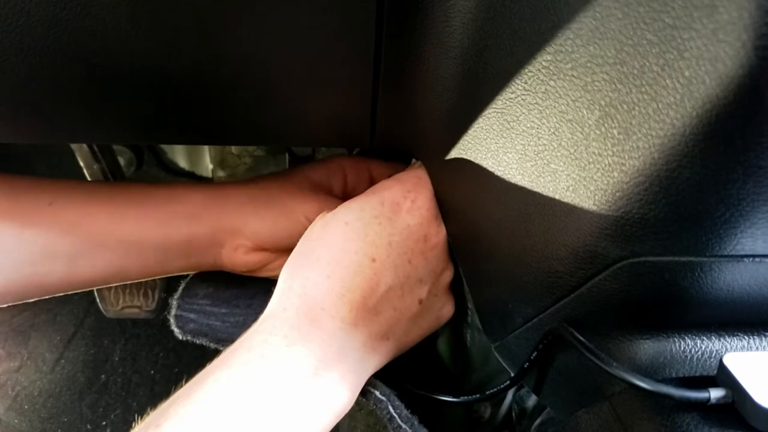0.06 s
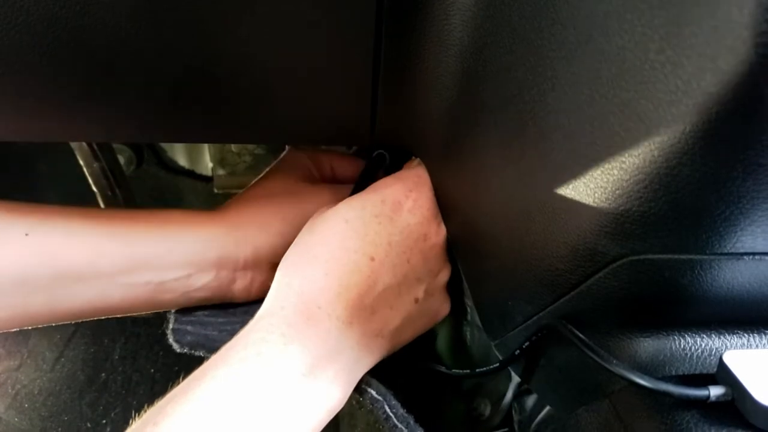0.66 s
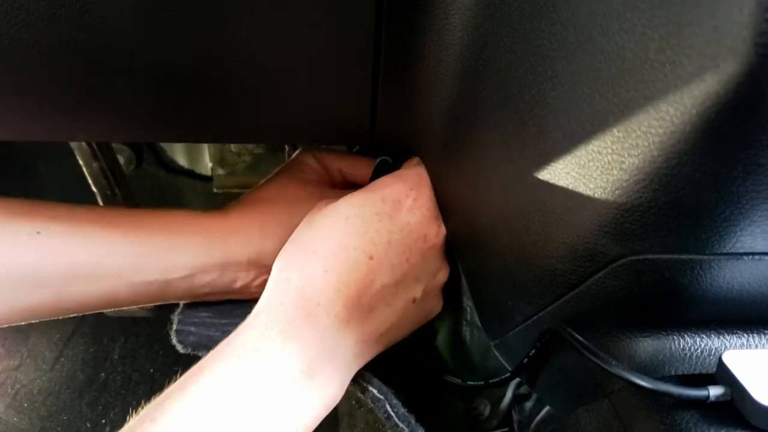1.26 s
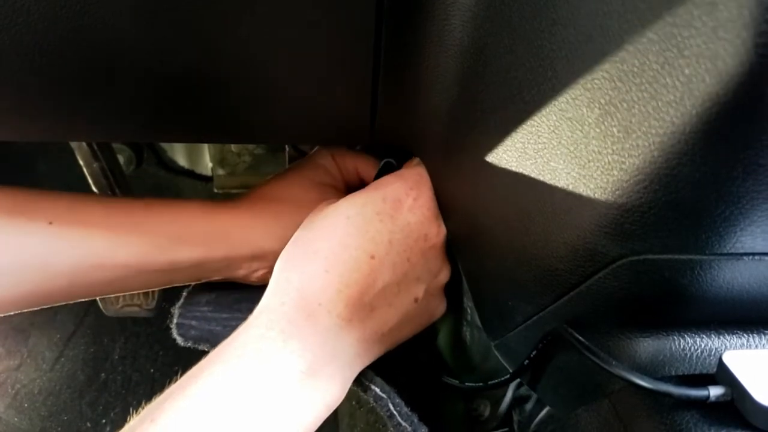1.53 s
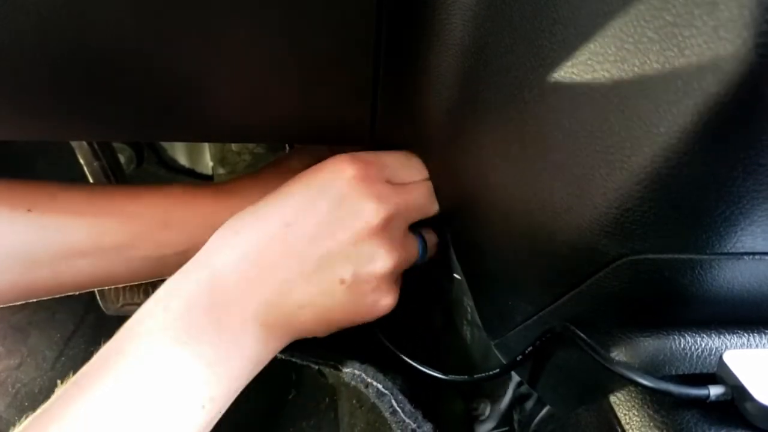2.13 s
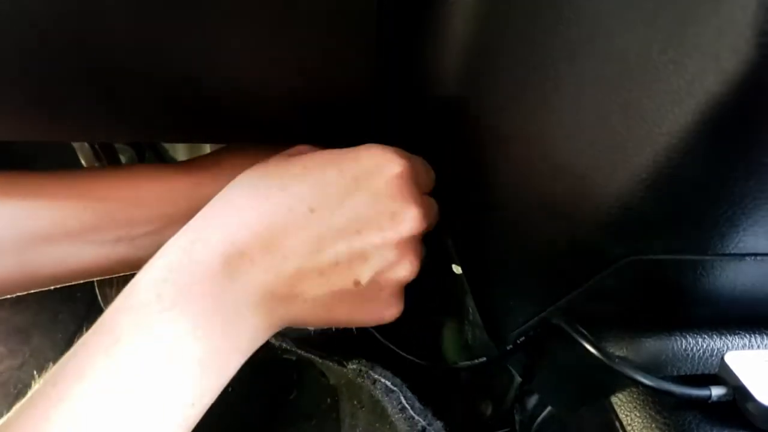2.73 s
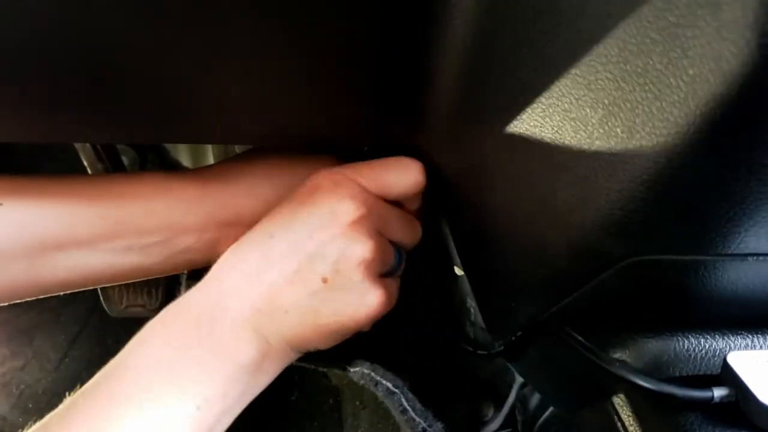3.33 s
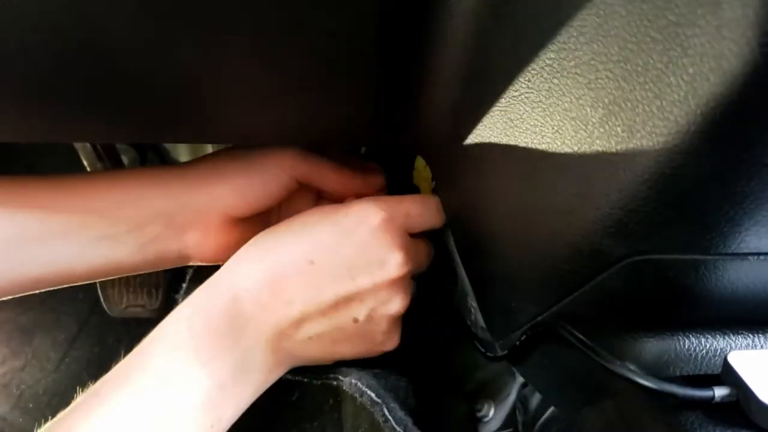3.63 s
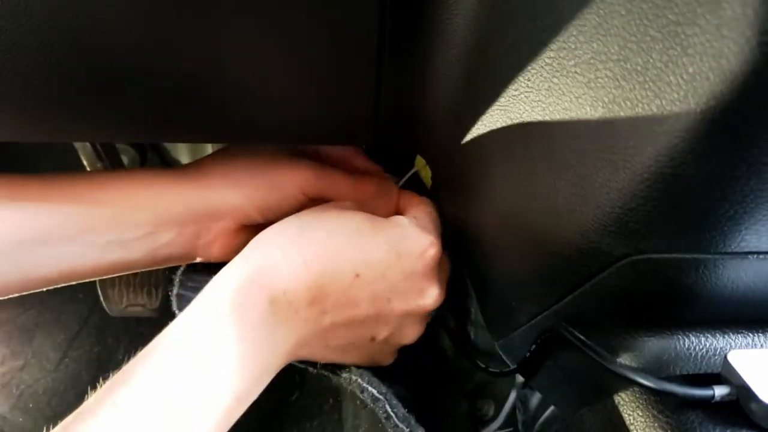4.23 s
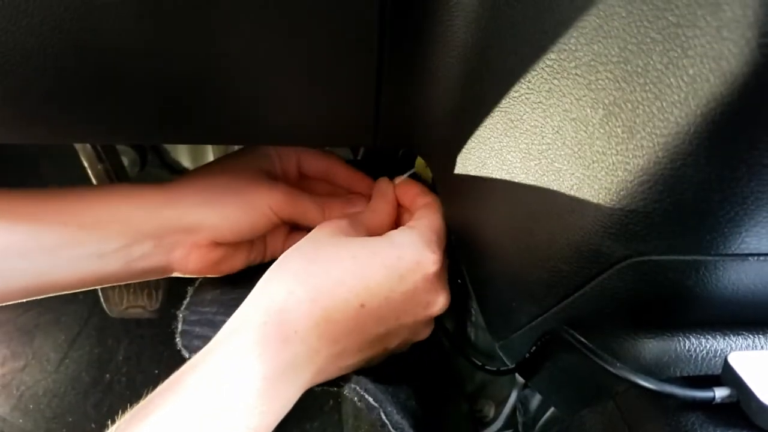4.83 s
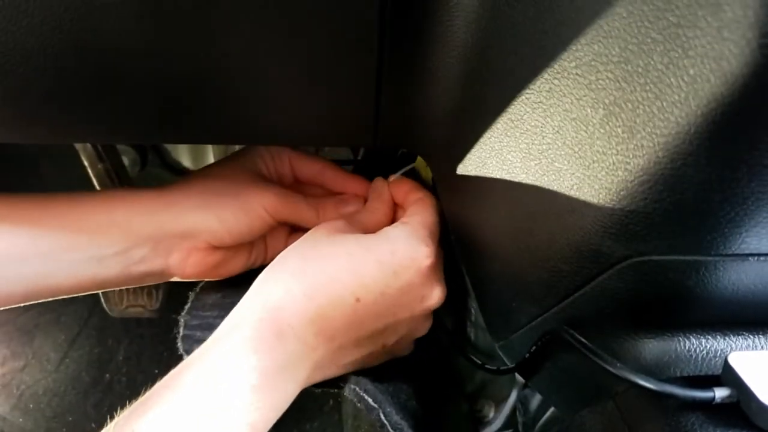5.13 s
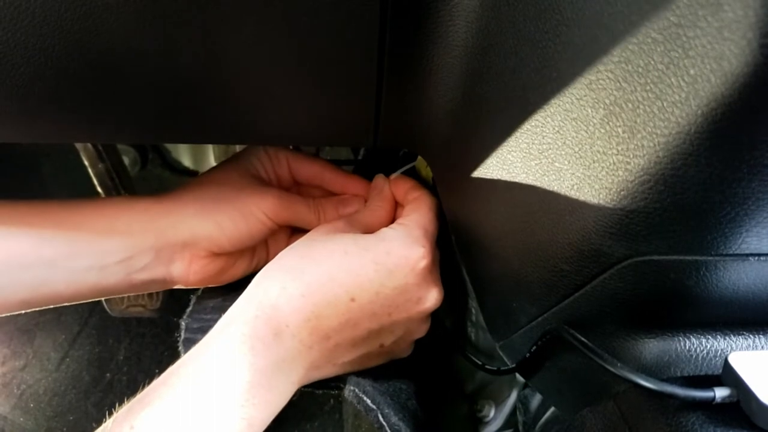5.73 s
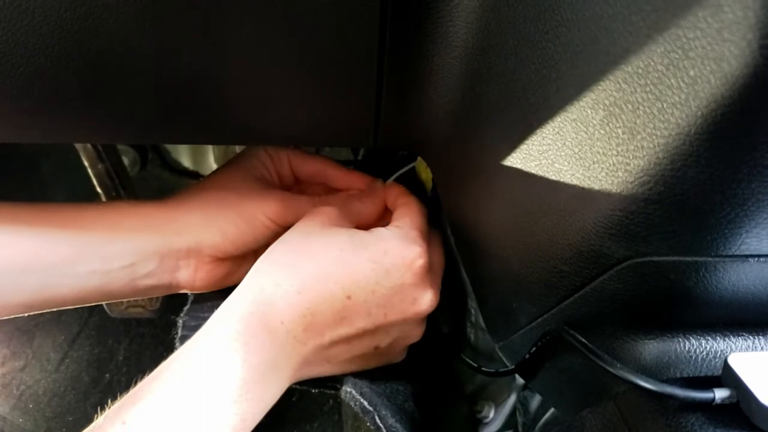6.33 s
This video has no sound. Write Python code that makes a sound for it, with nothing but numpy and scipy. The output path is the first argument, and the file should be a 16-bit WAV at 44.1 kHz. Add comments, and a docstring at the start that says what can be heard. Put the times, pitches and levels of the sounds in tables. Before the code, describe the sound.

Hands rustle and knock against plastic trim, working a zip tie around a cable, with sharp snaps, clacks and a faint low hum.

```python
"""Hands brush and rub over a low hum, working a plastic zip tie round a cable behind the trim of a
vehicle footwell. Fingers knock on a hollow shroud, cable and plug clack on the trim, arms bump the
panel; each rings the modes of the part struck. The tie's end is flicked and hard plastic snaps close
by. Last, the strap slides with a thin hiss and a few whistles. The cabin is small and dead."""
import sys
import numpy as np
from scipy import signal
from scipy.fft import rfft, irfft
from scipy.io import wavfile
from scipy.ndimage import map_coordinates

SR = 44100
rng = np.random.default_rng(int(sys.argv[2]) if len(sys.argv) > 2 else 0)


def pcm_store(signal):
    """Save signal as 16-bit PCM."""
    levels = np.round(np.clip(np.atleast_2d(signal), -1, 1) * 32767)
    wavfile.write(sys.argv[1], SR, levels.astype(np.int16).T)


N = 289737
TIME = np.arange(N) / SR
BIN_HZ = np.maximum(np.fft.rfftfreq(N, 1 / SR), 1)

# Skin on plastic. Each row: frequency in Hz, density in dB.
SWISH_SPECTRUM = [(2500, 4), (4000, -6.5), (5100, 0), (5800, -1), (6700, 2.5), (8300, -7), (11000, -3.5),
                  (13500, -4), (15500, -1)]
# Hollow panel. Each row: frequency in Hz, level in dB, t60 in seconds.
PANEL_MODES = [(184, 0, .08), (234, -2, .08), (264, -5, .06), (296, -1, .15), (365, -14, .06),
               (441, -10, .11)]
# Plastic shroud. Each row: frequency in Hz, level in dB, t60 in seconds.
SHROUD_MODES = [(510, -9, .05), (640, -4, .06), (850, -11, .035), (1120, 0, .055), (1278, 0, .055),
                (1480, -5, .03)]


def from_db(db):
    """Decibels to gain."""
    return 10 ** (np.asarray(db) / 20)


def unit_rms(x):
    """Scale to rms 1."""
    return x / np.sqrt(np.mean(x ** 2) + 1e-20)


def in_time(rows):
    """Per-sample curves from rows that start with a time in seconds."""
    s, *columns = np.transpose(rows)
    return [np.interp(TIME, s, c) for c in columns]


def at_hz(points, hz, column=1):
    """Interpolate a column over log frequency."""
    points = np.array(points)
    return np.interp(np.log(hz), np.log(points[:, 0]), points[:, column])


def add(out, start_s, sound):
    """Mix a sound in at start_s."""
    start = round(start_s * SR)
    out[:, start:start + sound.shape[1]] += sound[:, :N - start]


def wander(rate_hz):
    """Smooth random curve, rms 1."""
    knots = rng.standard_normal(N // 10)
    return unit_rms(np.interp(TIME * rate_hz, np.arange(len(knots)), knots))


def decay(t, t60):
    """Falls 60 dB in t60 seconds."""
    return np.exp(-np.log(1000) * t / max(t60, 1e-4))


def noise(spectrum, size=N, tilt_db_oct=0):
    """Coloured stereo noise, alike on both sides in the bass; rms 1."""
    # Each row: frequency in Hz, left-right correlation.
    coherence = [(100, 0.97), (300, 0.59), (600, 0.77), (1100, 0), (2000, 0.027), (15000, 0)]
    hz = np.maximum(np.fft.rfftfreq(size, 1 / SR), 1)
    mid, side = rfft(rng.standard_normal((2, size)))
    alike = at_hz(coherence, hz)
    pair = np.sqrt(1 + alike) * mid + np.sqrt(1 - alike) * side * [[1], [-1]]
    skirts = np.minimum(hz / spectrum[0][0], 1) * np.minimum(spectrum[-1][0] / hz, 1) ** 2
    colour = from_db(at_hz(spectrum, hz) + tilt_db_oct * np.log2(hz))
    return unit_rms(irfft(pair * skirts * colour, size))


def narrow_noise(hz, width_hz, size=N):
    """Noise in one resonance; centre and width may move; rms 1."""
    steps = np.cumsum(width_hz * np.ones(size)) / SR
    knots = rng.standard_normal((2, size // 4))
    in_phase, quadrature = (map_coordinates(row, [steps], order=1, mode="wrap") for row in knots)
    phase = 2 * np.pi * np.cumsum(hz * np.ones(size)) / SR
    return unit_rms(in_phase * np.cos(phase) + quadrature * np.sin(phase))


def narrow_pair(hz, width_hz, size=N):
    """One resonance, independent noise on each side."""
    return np.array([narrow_noise(hz, width_hz, size), narrow_noise(hz, width_hz, size)])


def struck(modes, t, spread_db):
    """Decaying modes with random strength and phase on each side."""
    return sum(from_db(db + spread_db * rng.standard_normal((2, 1))) * decay(t, t60)
               * np.sin(2 * np.pi * (hz * t + rng.random((2, 1)))) for hz, db, t60 in modes)


def rubbed(modes, tilt_db_oct):
    """Noise-driven modes, widths set by their decay; stereo, rms 1."""
    shape = sum(from_db(db + tilt_db_oct * np.log2(hz)) * np.sqrt(t60)
                / (1 + (2 * np.pi * (BIN_HZ - hz) * t60 / np.log(1000)) ** 2) for hz, db, t60 in modes)
    return unit_rms(irfft(rfft(rng.standard_normal((2, N))) * shape, N))


def grain(slips_per_s, slip_s, share):
    """Friction gain: steady, with a share of the power in tiny random slips."""
    slips = (rng.random(N) < slips_per_s / SR) * rng.exponential(1, N)
    power = signal.lfilter([1], [1, -np.exp(-1 / (slip_s * SR))], slips + 1e-18)
    return np.sqrt(1 - share + share * power / power.mean())


def cabin_hum(hum_db=0.48, swell_depth=0.78, air_db=-59):
    """The cabin's low resonances waver over a dull rumble of air."""
    # Each row: centre in Hz, width in Hz, level in dB.
    resonances = [(54.8, 31, -60.5), (73.16, 24, -51.5), (91.7, 50, -54.5), (108, 17, -58),
                  (246, 63, -70.5)]
    # Each row: time in seconds, swell in dB before centring and scaling by swell_depth.
    swell = [(0.0, -39), (0.22, -68.5), (0.33, -48.5), (1.85, -51.5), (2.12, -46), (4.45, -49), (5.53, -45),
             (6.07, -58.5), (6.15, -44.5), (6.31, -58.5), (6.46, -45), (6.57, -60)]
    # Each row: frequency in Hz, density in dB.
    air_spectrum = [(28, -25), (42, 0.5), (65, -28), (110, 3), (160, -8), (260, -19.5), (400, -48),
                    (700, -66), (1500, -76)]
    swell_db, = in_time(swell)
    gain = from_db(hum_db + swell_depth * (swell_db - swell_db.mean()))
    hum = sum(from_db(db) * narrow_noise(hz, width_hz) for hz, width_hz, db in resonances)
    return gain * hum + from_db(air_db) * noise(air_spectrum)


def microphone_hiss(level_db=-62):
    """Steady hiss, coloured differently in each microphone."""
    # Each row: frequency in Hz, left density in dB, right density in dB.
    spectrum = [(202, 19.5, -6), (600, 0.5, 2), (1170, -1, -1.5), (1550, -9, 6.5), (1780, 3.5, 1.5),
                (2240, 17.5, 1), (2600, 15, -6), (3200, 0.5, -5.5), (4500, -5, -4.5), (6100, -16, -12),
                (6230, 1.5, -11), (7170, -0.5, -16), (8200, -6.5, -17), (11800, -7.5, -7),
                (16100, -0.5, -8)]
    colour = from_db([at_hz(spectrum, BIN_HZ, column=1), at_hz(spectrum, BIN_HZ, column=2)])
    return from_db(level_db) * unit_rms(irfft(rfft(rng.standard_normal((2, N))) * colour, N))


def hand_strokes(rustle_db=-13.5, flutter_db=2.5):
    """Skin brushes plastic in swells; more pressure gives more panel rumble and cable rustle."""
    # Each row: middle in seconds, length in seconds, swish in dB, then pressure and brightness
    # in dB relative to the swish.
    strokes = [(0.09, 0.12, -62.5, 5.5, -4), (0.278, 0.42, -60, -2, 1.5), (0.506, 0.59, -58, -3.5, 1.5),
               (0.853, 0.71, -64, -6.5, 1.5), (1.19, 0.59, -64, 7, -1), (1.373, 0.76, -57, -3.5, 2),
               (1.955, 0.19, -50.5, 8, -2.5), (2.063, 0.15, -52, 1, 0), (2.185, 0.33, -46, 10, -1),
               (2.346, 0.68, -59.5, -9, 1), (2.495, 0.22, -54.5, 12.5, -1), (2.636, 0.2, -58.5, -13, 4),
               (2.752, 0.53, -55.5, 3, -1), (3.025, 0.23, -50.5, 0, 3), (3.213, 0.17, -57.5, 5, 0),
               (3.3, 0.18, -58, -5, 3.5), (3.448, 0.33, -55, 1, 0), (3.63, 0.27, -51.5, 0.5, -0.5),
               (3.853, 0.52, -57.5, 4.5, -1.5), (4.105, 0.21, -56.5, 5.5, -1),
               (4.192, 0.22, -58.5, 2.5, 2.5), (4.365, 0.78, -61.5, -1, -0.5), (4.747, 0.38, -64, -10, 2.5),
               (6.355, 0.64, -69, 3, 3)]
    # Each row of both: frequency in Hz, density in dB.
    rumble_spectrum = [(100, -11.5), (175, -3.5), (255, -1), (300, -8), (360, -8), (480, -9), (580, -13),
                       (900, -20)]
    rustle_spectrum = [(350, -15), (480, -5), (640, -1), (780, -6), (980, -5), (1120, 3), (1280, 3),
                       (1430, -5), (1600, -2), (2000, -5), (2700, -8), (3800, -19), (6000, -31)]
    resting_db = [[-71], [-78], [-73], [-76]]   # rumble, rustle, swish, top of the swish
    power = from_db(resting_db) ** 2 * np.ones(N)
    for middle_s, length_s, db, pressure_db, bright_db in strokes:
        swell = 1 / np.cosh(np.clip(2 * np.pi * (TIME - middle_s) / length_s, -20, 20))
        peak_db = [[db + pressure_db], [db + pressure_db + rustle_db], [db], [db + bright_db]]
        power += (from_db(peak_db) * swell) ** 2
    rumble_gain, rustle_gain, swish_gain, top_gain = np.sqrt(power)
    panel = (from_db(-2) * noise(rumble_spectrum) * grain(slips_per_s=320, slip_s=0.003, share=0.12)
             + from_db(-3.5) * rubbed(PANEL_MODES, tilt_db_oct=1.5)[0]
             + from_db(-9) * narrow_noise(hz=57, width_hz=55))   # panel sway
    cable = (from_db(-6) * noise(rustle_spectrum) * grain(slips_per_s=69, slip_s=0.002, share=0.24)
             + from_db(-2) * rubbed(SHROUD_MODES, tilt_db_oct=-9))
    flutter = from_db(flutter_db * wander(rate_hz=57))
    return flutter * (rumble_gain * panel + rustle_gain * cable) + skin_swish(swish_gain, top_gain)


def skin_swish(swish_gain, top_gain, top_hz=8000, roll_db=1.6, slips_per_s=160, slip_s=0.0008, share=0.28):
    """Skin scratches in single bands and across all; the colour shifts as the finger rolls."""
    band_edges_hz = [0, 5500, 8000, 10500, 13000, 22050]
    spectrum, out = rfft(noise(SWISH_SPECTRUM)), 0
    for low_hz, high_hz in zip(band_edges_hz, band_edges_hz[1:]):
        band = irfft(spectrum * ((BIN_HZ >= low_hz) & (BIN_HZ < high_hz)), N)
        gain = swish_gain if low_hz < top_hz else top_gain
        roll = from_db(roll_db * wander(rate_hz=40))
        out = out + gain * roll * grain(slips_per_s, slip_s, share) * band
    return out * grain(slips_per_s, slip_s, share / 2)


def plastic_squeaks(grain_db=2):
    """Dry stick-slip excites one resonance of the plastic, swelling and fading."""
    # Each row: middle in seconds, length in seconds, centre in Hz, width over centre, level in dB.
    squeaks = [(0.228, 0.18, 6030, 0.35, -65), (0.9, 0.09, 5220, 0.3, -69), (1.29, 0.29, 2130, 0.2, -65),
               (1.339, 0.17, 5150, 0.18, -62), (2.42, 0.13, 5040, 0.07, -63),
               (2.395, 0.27, 6570, 0.15, -63), (4.32, 0.32, 6680, 0.13, -65),
               (4.77, 0.092, 5670, 0.46, -67)]
    out = np.zeros((2, N))
    for middle_s, length_s, hz, width, db in squeaks:
        size = int(length_s * SR)
        swell = from_db(db) * np.sin(np.linspace(0, np.pi, size))
        add(out, middle_s - length_s / 2, swell * narrow_pair(hz, width * hz, size))
    return out * from_db(grain_db * wander(rate_hz=230))


def shroud_knocks(slips_per_s=450, slip_db=-3, right_db=3):
    """A finger lands, then drags in a fading run of slips; each rings the hollow shroud."""
    # Each row: start in seconds, level in dB, drag in seconds, pitch factor.
    knocks = [(0.208, -51.5, 0.11, 0.87), (0.907, -51.5, .04, 1.07), (1.139, -52, 0.059, 1.2),
              (1.189, -48, 0.054, 1.22), (1.345, -53.5, 0.14, 1.3), (1.925, -41, 0.13, 0.96),
              (2.125, -39.5, 0.13, 1.22), (2.215, -42, 0.1, 0.96), (2.285, -43, 0.054, 0.98),
              (2.384, -48, 0.071, 1), (2.473, -38, .025, 1.07), (2.53, -42.5, 0.029, 0.73),
              (3.39, -37, 0.029, 1), (3.886, -43, 0.039, 0.86), (4.087, -40, .04, 0.93)]
    out, t = np.zeros((2, N)), TIME[:SR // 4]
    for start_s, db, drag_s, pitch in knocks:
        slips = (rng.random(len(t)) < slips_per_s / SR) * rng.standard_normal(len(t))
        force = from_db(slip_db) * slips * np.maximum(1 - t / drag_s, 0)
        force[0] = 1   # landing
        modes = [(hz * pitch, mode_db, t60) for hz, mode_db, t60 in SHROUD_MODES]
        knock = signal.fftconvolve(struck(modes, t, spread_db=1.5), force[None], axes=1)
        add(out, start_s, from_db(db) * knock / np.abs(knock).max())
    return out * from_db([[0], [right_db]])


def trim_clacks(cabin_db=-22, cabin_t60_s=0.36, modes_db=-8.5, rise_s=0.000087):
    """Cable and plug hit the trim: crack, ring and cabin tail. Stiff spots give no lows."""
    # Each row: start in seconds, level in dB, crack t60 in seconds, tilt in dB per octave.
    clacks = [(0.547, -39, 0.057, 1.5), (0.553, -40, 0.066, 1), (2.171, -33, 0.054, 7),
              (2.7736, -32, 0.016, -2), (3.0334, -28, 0.032, 4.5), (3.0454, -30, 0.037, 2),
              (3.2056, -24, 0.015, -1.5), (3.385, -34, 0.017, 5), (3.388, -35.5, 0.11, 1),
              (3.788, -34, 0.017, -1.5), (3.8148, -41.5, 0.07, -2), (3.828, -35, 0.017, -4.5),
              (3.842, -40, 0.031, -10), (3.908, -45.5, 0.13, -1.5), (4.0574, -38.5, 0.073, -0.5),
              (4.085, -42.5, 0.097, -1)]
    # Each row: frequency in Hz, density in dB.
    trim_spectrum = [(150, -57), (280, 14.5), (400, 8.5), (520, 6.5), (750, 4), (1100, -1.5), (1600, 1),
                     (2300, -0.5), (3100, -5.5), (3800, -15), (5200, -15.5), (7000, -20.5), (9000, -36),
                     (15500, -36)]
    # Each row: frequency in Hz, level in dB, t60 in seconds.
    trim_modes = [(635, -11, .07), (1120, -9, .07), (1280, -6, .07), (1600, -2, .06), (1925, -3, .05),
                  (2190, -4, .05), (2930, -6, .05)]
    out, t = np.zeros((2, N)), TIME[:SR // 4]
    attack = 1 - np.exp(-t / rise_s)
    tail = from_db(cabin_db) * decay(t, cabin_t60_s)
    for start_s, db, crack_s, tilt_db_oct in clacks:
        crack = noise(trim_spectrum, len(t), tilt_db_oct) * (decay(t, crack_s) + tail)
        modes = [(hz, mode_db + tilt_db_oct * np.log2(hz / 1500), t60) for hz, mode_db, t60 in trim_modes]
        ring = from_db(modes_db) * struck(modes, t, spread_db=0.5)
        lowest_hz = 1510 * (0.022 / crack_s) ** 0.99   # shorter crack, stiffer spot
        highpass = signal.butter(3, lowest_hz, "high", fs=SR, output="sos")
        add(out, start_s, from_db(db) * signal.sosfilt(highpass, (crack + ring) * attack))
    return out


def panel_bumps(contact_cycles=0.49, falloff_db_oct=29, radiate_hz=135):
    """A knuckle gives a soft push; the spot it meets selects which panel modes boom."""
    # Each row: start in seconds, level in dB, the spot's favoured frequency in Hz.
    bumps = [(0.548, -43, 320), (1.929, -23.5, 177), (1.962, -37.5, 181), (2.103, -29, 181),
             (2.15, -25, 190), (2.191, -25.5, 186), (2.229, -18.5, 203), (2.473, -17, 184),
             (2.478, -24.5, 302), (2.651, -25.5, 174), (2.773, -35, 256), (3.034, -37, 274),
             (3.048, -39.5, 237), (3.389, -27.5, 266), (3.907, -37.5, 297), (4.058, -29, 410),
             (4.086, -38, 298)]
    out, t = np.zeros((2, N)), TIME[:SR // 4]
    for start_s, db, spot_hz in bumps:
        push = np.sin(np.pi * np.minimum(t * spot_hz / contact_cycles, 1))
        boom = sum(from_db(mode_db - falloff_db_oct * abs(np.log2(hz / spot_hz)))
                   * decay(t, t60) * np.sin(2 * np.pi * hz * t) for hz, mode_db, t60 in PANEL_MODES)
        add(out, start_s, from_db(db) * signal.fftconvolve(boom, push / push.sum())[None, :len(t)])
    # A small panel radiates little deep bass.
    return signal.sosfilt(signal.butter(2, radiate_hz, "high", fs=SR, output="sos"), out)


def edge_catches():
    """Nails and the tie's teeth catch on plastic and scratch free in short, bright bursts."""
    # Each row: start in seconds, level in dB, t60 in seconds.
    catches = [(0.548, -50, .01), (1.435, -43.5, 0.037), (1.702, -47, 0.017), (2.297, -44.5, 0.11),
               (2.473, -44, 0.047), (3.415, -42, .025), (3.644, -44, .015), (4.17, -53, .025),
               (4.2, -52, .02), (4.81, -51, .02)]
    out, t = np.zeros((2, N)), TIME[:SR // 4]
    for start_s, db, t60 in catches:
        add(out, start_s, from_db(db) * noise(SWISH_SPECTRUM, len(t), tilt_db_oct=3) * decay(t, t60))
    return out


def tie_flicks(flutter_db=3.5):
    """The tie's flicked end rings thinly and unsteadily against the fingers."""
    # Each row: start in seconds, level in dB, ring time in seconds.
    flicks = [(1.7, -53, 0.1), (1.722, -52.5, 0.11), (2.255, -54, 0.19), (2.296, -50.5, 0.12),
              (2.475, -42.5, 0.047), (3.388, -49, 0.19), (3.909, -53.5, .04)]
    # Each row: frequency in Hz, level in dB, t60 as a share of the ring time.
    tie_modes = [(5060, 0, .95), (5300, -5, .6), (5560, -4, .8), (6000, -5, .7), (6420, -6, .5)]
    out, t = np.zeros((2, N)), TIME[:SR // 4]
    for start_s, db, ring_s in flicks:
        modes = [(hz, mode_db, share * ring_s) for hz, mode_db, share in tie_modes]
        add(out, start_s, from_db(db) * struck(modes, t, spread_db=-1))
    return out * from_db(flutter_db * wander(rate_hz=300.4))


def plastic_snaps(cabin_t60_s=0.086, modes_db=-4, right_db=-1):
    """Hard plastic lets go: a bright crack and a ring, cut short where fingers hold it."""
    # Each row: start in seconds, level in dB, slip in seconds, pitch factor, share of the ring time
    # the fingers leave, cabin echo in dB.
    snaps = [(2.0518, -20, 0.00092, 0.9, 0.093, -15), (2.1693, -14.5, 0.018, 1, 0.89, -19)]
    # Each row: frequency in Hz, density in dB.
    crack_spectrum = [(1200, -30), (3000, -17), (4100, -32), (5000, -10), (5900, 1), (7500, -3), (8700, 1),
                      (10500, -2), (13500, 2), (18000, 0)]
    # Each row: frequency in Hz, level in dB, free t60 in seconds.
    snap_modes = [(5071, -12, .042), (5740, -4, .02), (5943, -1.5, .046), (6200, -5, .025),
                  (8610, -4.5, .03), (10750, -10, .03), (12610, -8, .03), (14370, -1, .022)]
    out, t = np.zeros((2, N)), TIME[:SR // 4]
    for start_s, db, slip_s, pitch, ring_share, echo_db in snaps:
        crack = noise([(hz * pitch, density_db) for hz, density_db in crack_spectrum], len(t))
        modes = [(hz * pitch, mode_db, t60 * ring_share) for hz, mode_db, t60 in snap_modes]
        ring = from_db(modes_db) * struck(modes, t, spread_db=0)
        echo = from_db(echo_db) * decay(t, cabin_t60_s * np.sqrt(ring_share))
        add(out, start_s, from_db(db) * (crack * (decay(t, slip_s) + echo) + ring))
    return out * from_db([[0], [right_db]])


def strap_slide(fade_in_s=0.04, uneven_db=1, grain_db=2, whistle_width_hz=195):
    """The sliding strap hisses, sinking in pitch and rising again, then whistles in short glides."""
    # Each row: time in seconds, centre in Hz, level in dB.
    slide = [(4.75, 11350, -70), (4.87, 11540, -71), (5.15, 11100, -73.5), (5.3, 11130, -65.5),
             (5.45, 10400, -67), (5.57, 8880, -68), (5.68, 7120, -63), (5.77, 7140, -63), (5.84, 7400, -68),
             (5.91, 10400, -74), (6.57, 10240, -78)]
    # Fixed resonances the hiss moves through. Each row: frequency in Hz, gain in dB.
    colour = [(5800, -16), (6400, 0), (7400, 0), (8500, -6), (9400, 0), (12500, 0), (13800, -8)]
    # Each row: start in seconds, length in seconds, first and last pitch in Hz, level in dB.
    whistles = [(5.89, 0.095, 6300, 6220, -70), (6.095, 0.085, 6330, 6720, -67),
                (6.212, 0.094, 6780, 6750, -70), (6.264, 0.073, 6560, 6300, -69),
                (6.368, 0.042, 6550, 6280, -68)]
    centre_hz, slide_db = in_time(slide)
    fade_in = np.clip((TIME - slide[0][0]) / fade_in_s, 0, 1)
    gain = from_db(slide_db + uneven_db * wander(rate_hz=34) + grain_db * wander(rate_hz=340))
    scrape = fade_in * gain * narrow_pair(centre_hz, width_hz=0.42 * centre_hz)
    out = irfft(rfft(scrape) * from_db(at_hz(colour, BIN_HZ)), N)
    for start_s, length_s, first_hz, last_hz, db in whistles:
        size = int(length_s * SR)
        swell = from_db(db) * np.sqrt(np.abs(np.sin(np.linspace(0, np.pi, size))))
        glide_hz = np.linspace(first_hz, last_hz, size)
        add(out, start_s, swell * narrow_pair(glide_hz, whistle_width_hz, size))
    return out


def scene():
    """All sources at an open left microphone and a shaded right one."""
    # Each row: frequency in Hz, right-side gain in dB.
    shade = [(60, -5), (300, -5), (600, -7), (1000, 0), (1500, -1.5), (2400, -1.5), (3200, -6.5),
             (4700, -2), (7300, -27), (9000, -16.5), (11800, -5), (15500, -20)]
    left, right = (hand_strokes() + trim_clacks() + shroud_knocks() + panel_bumps() + plastic_snaps()
                   + tie_flicks() + edge_catches() + strap_slide() + plastic_squeaks() + cabin_hum())
    return np.array([left, irfft(rfft(right) * from_db(at_hz(shade, BIN_HZ)), N)])


def record(dry, cutoff_hz=15900):
    """Add microphone hiss, then a steep low-pass."""
    lowpass = signal.ellip(12, 0.1, 80, cutoff_hz, fs=SR, output="sos")
    return signal.sosfilt(lowpass, dry + microphone_hiss())


dry = scene()
out = record(dry)
pcm_store(out)
```